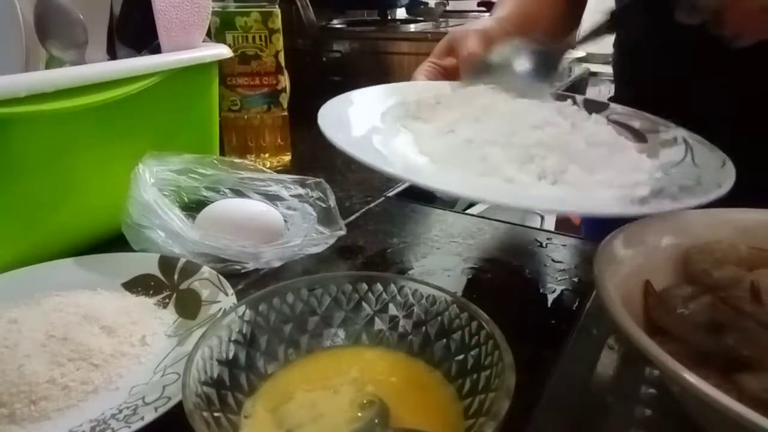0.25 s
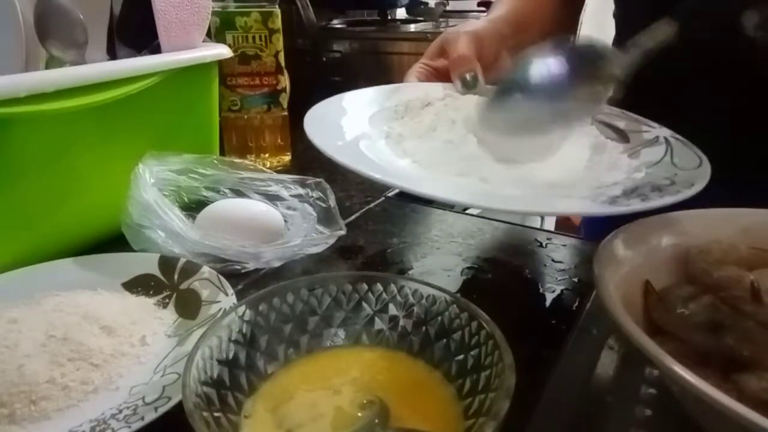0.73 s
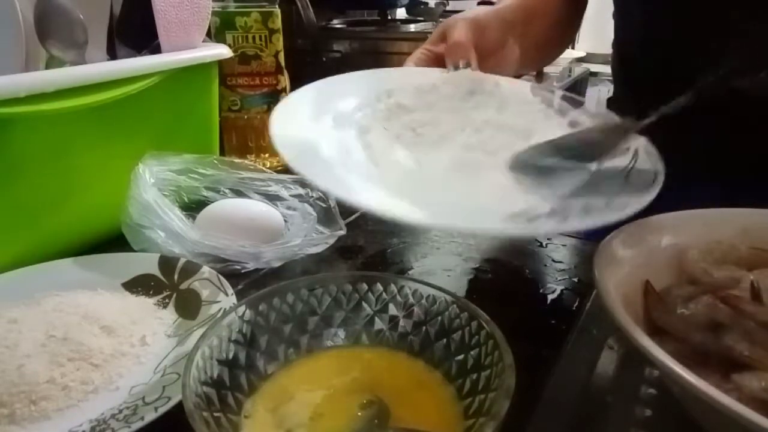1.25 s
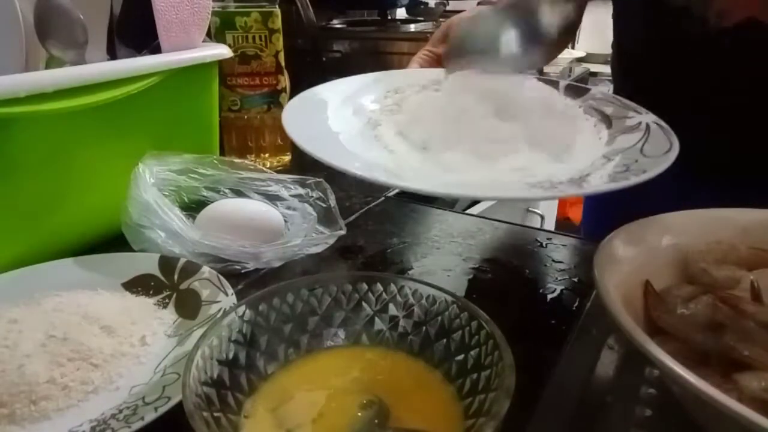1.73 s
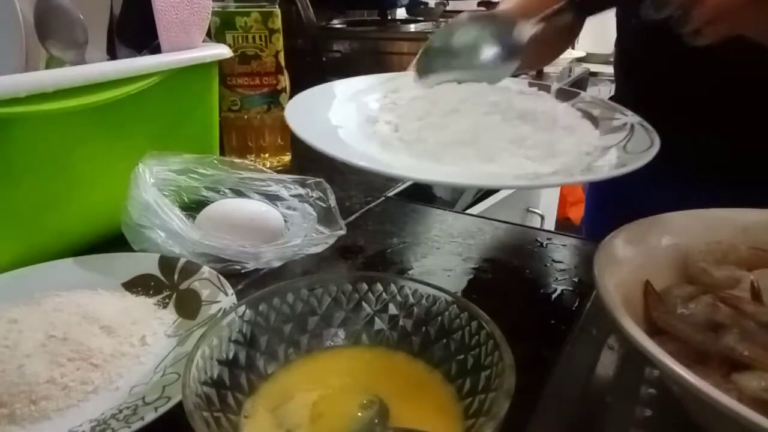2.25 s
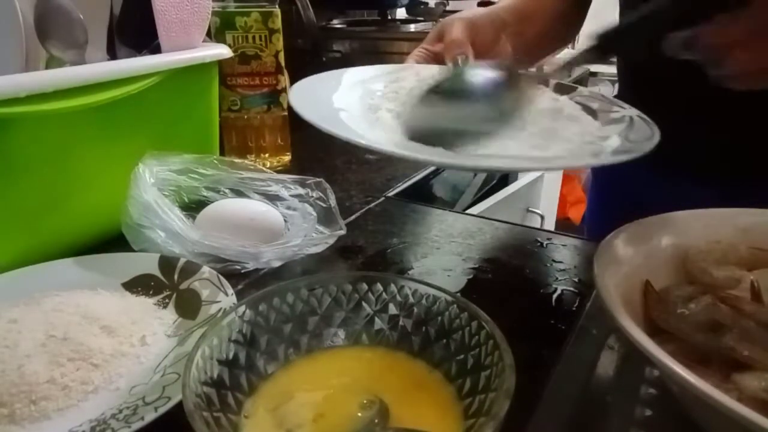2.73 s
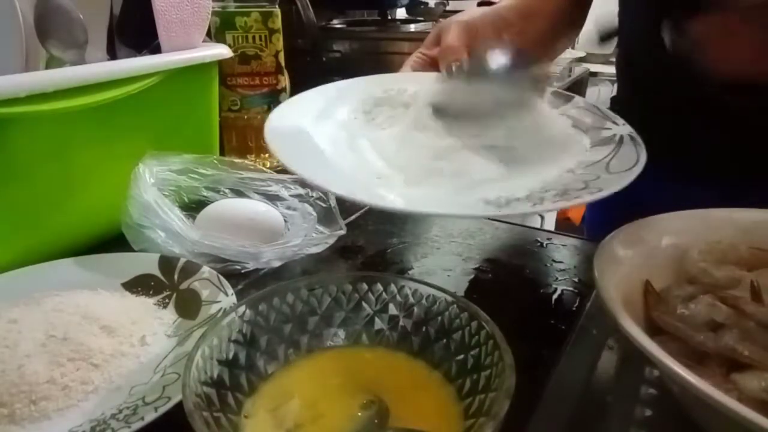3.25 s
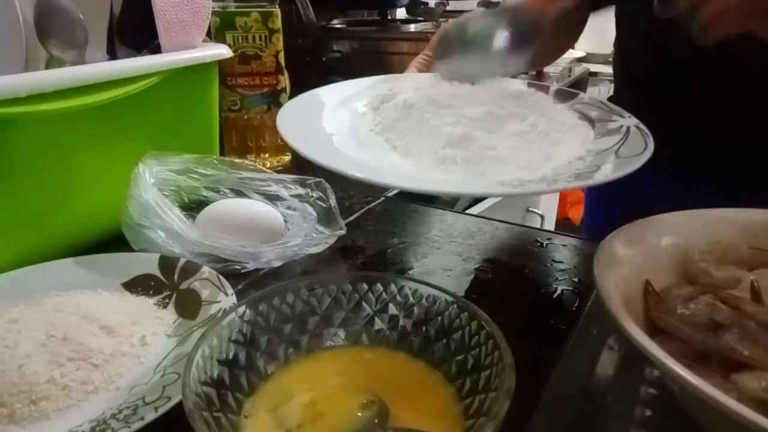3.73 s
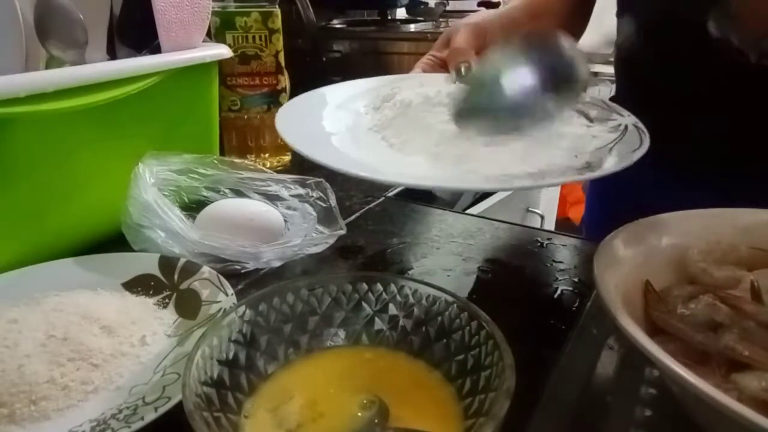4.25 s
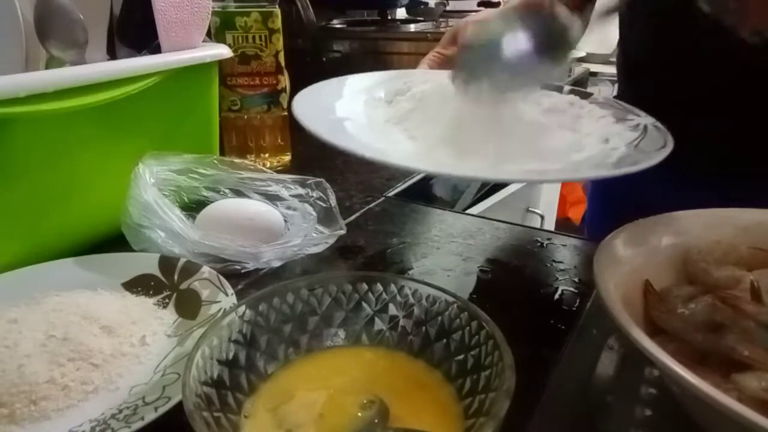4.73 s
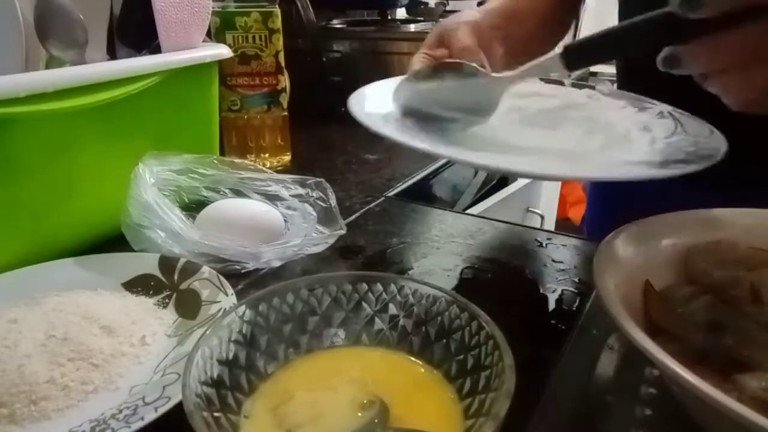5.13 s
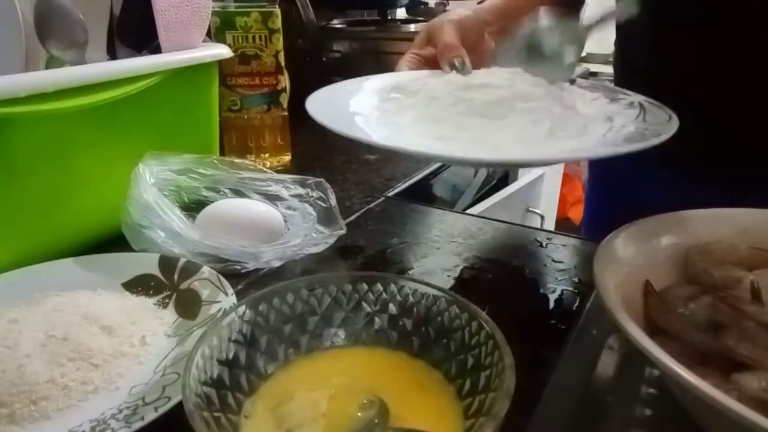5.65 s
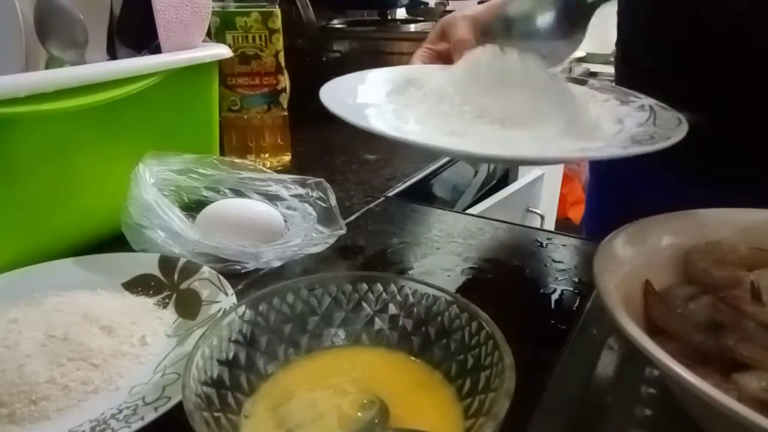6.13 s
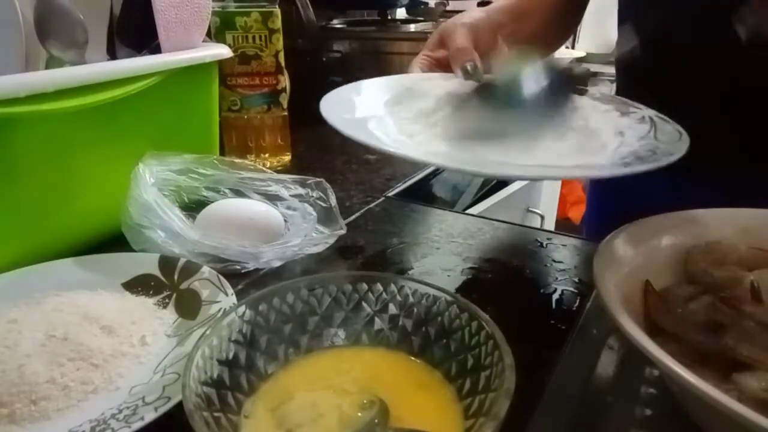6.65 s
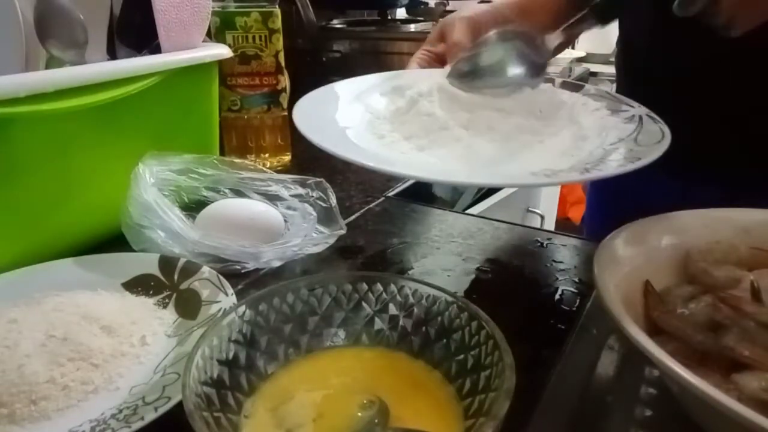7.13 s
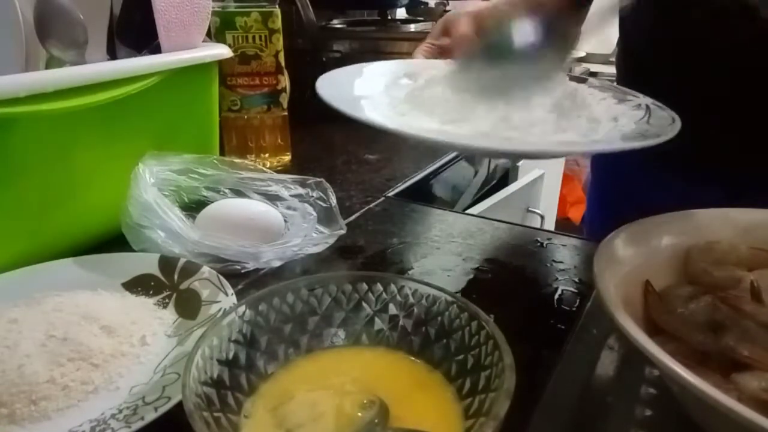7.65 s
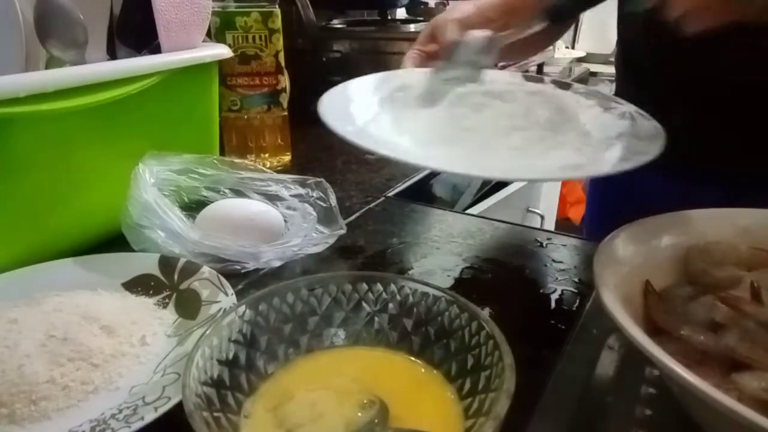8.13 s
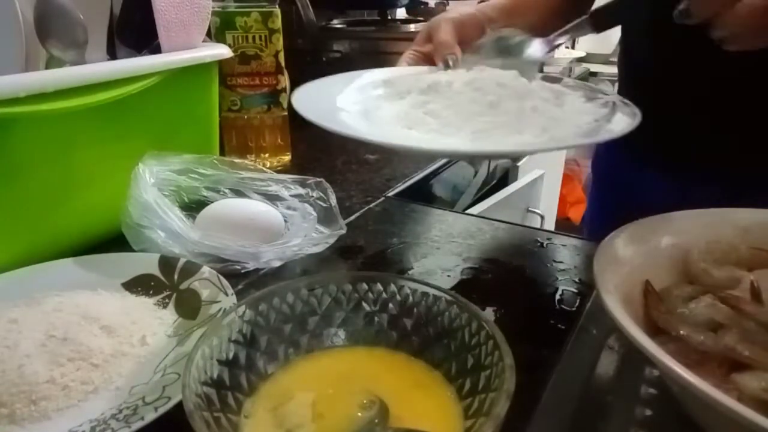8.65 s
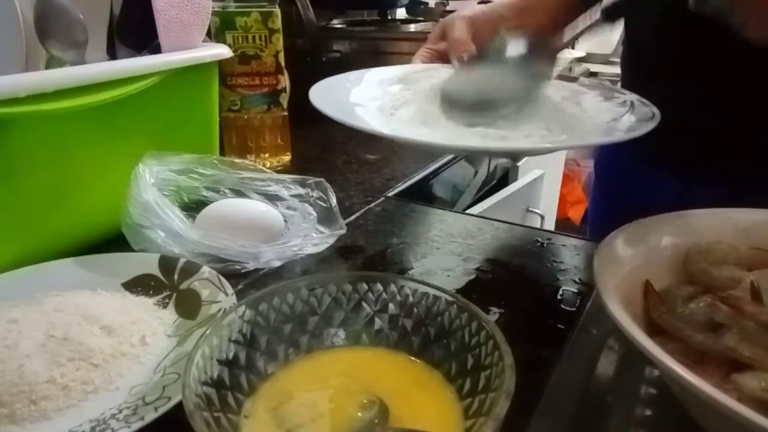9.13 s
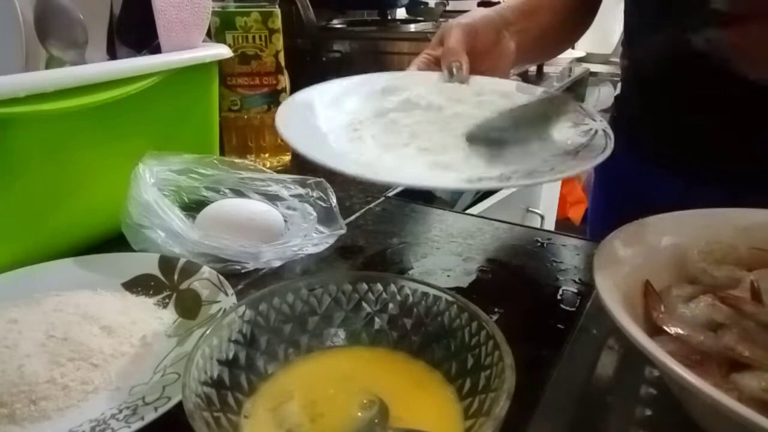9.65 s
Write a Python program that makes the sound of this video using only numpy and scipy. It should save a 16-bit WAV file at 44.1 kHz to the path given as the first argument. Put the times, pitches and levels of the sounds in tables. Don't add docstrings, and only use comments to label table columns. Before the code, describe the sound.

Gritty spoon strokes hiss through flour on a hand-held plate, punctuated by sharp clinks and soft thuds, over faint street rumble and microphone hiss.

```python
import sys
import numpy as np
from scipy import signal
from scipy.fft import rfft, irfft, next_fast_len
from scipy.io import wavfile

SR = 44100
rng = np.random.default_rng(int(sys.argv[2]) if len(sys.argv) > 2 else 0)


def output_pcm(signal):
    pcm = np.clip(np.atleast_2d(signal).T, -1, 1) * 32767
    wavfile.write(sys.argv[1], SR, np.round(pcm).astype(np.int16))


def attenuation_scalar(level_db):
    decades = np.asarray(level_db, float) / 20
    return 10 ** decades


N = 436590


def in_time(rows):
    s, *columns = np.transpose(rows)
    return [np.interp(np.arange(N) / SR, s, column) for column in columns]


def rms_one(x):
    return x / np.sqrt(np.mean(x ** 2) + 1e-20)


def drift(rate_hz):
    knots = rng.standard_normal(1001)
    return np.interp(np.arange(N) / SR * rate_hz, np.arange(len(knots)), knots)


def swell(middle, length):
    half = max(length, .05) / 2
    first, end = max(round((middle - half) * SR), 0), min(round((middle + half) * SR), N)
    out, span = np.zeros(N), np.arange(first, end)
    out[span] = np.cos(np.pi / 2 * (span / SR - middle) / half) ** 2
    return out


def swells(rows):
    return sum(attenuation_scalar(db) * swell(middle, length) for middle, length, db in rows)


def resonate(x, peaks):
    out = 0
    for k, (hz, width, db) in enumerate(peaks):
        r = np.exp(-np.pi * width / SR)
        b = (1 - r * r) / 2 * np.array([1, 0, -1])
        a = [1, -2 * r * np.cos(2 * np.pi * hz / SR), r * r]
        twice = signal.lfilter(b, a, signal.lfilter(b, a, x))
        out = out + (-1) ** k * attenuation_scalar(db) * twice
    return rms_one(out)


def patchy(x, peaks, patch_db):
    out = 0
    for k, (hz, width, db) in enumerate(peaks):
        gain = attenuation_scalar(db + patch_db * drift(14)) * width ** .5
        out = out + (-1) ** k * gain * resonate(x, [(hz, width, 0)])
    return rms_one(out)


def grit(spread_db, flutter_db):
    sizes = attenuation_scalar(spread_db * np.minimum(rng.exponential(1, N), 4))
    return rng.standard_normal(N) * sizes * attenuation_scalar(flutter_db * drift(45))


def away(hz, favoured_hz):
    return np.abs(np.log2(hz / favoured_hz))


def tint(x, hz, db):
    size = 2 ** 14
    bins = np.arange(size // 2 + 1) * SR / size + 1
    cepstrum = irfft(np.log(10) / 20 * np.interp(np.log(bins), np.log(hz), db))
    cepstrum[1:size // 2] *= 2
    return irfft(rfft(x, size) * np.exp(rfft(cepstrum[:size // 2], size)), size)[:len(x)]


def struck(modes, t, free, colour_db, split_hz):
    hz, db, t60 = (column[:, None] for column in np.transpose(modes))
    decay = attenuation_scalar(db + colour_db[:, None] - 60 * t / (t60 * np.clip(free, .09, 1.1)))
    partner = np.sin(2 * np.pi * (hz + split_hz[:, None]) * t + 2)
    pair = np.sin(2 * np.pi * hz * t) - .6 * partner
    rings = (decay * pair).sum(0) * (1 - np.exp(-t * hz.min() / .6))
    return rings / np.abs(rings).max()


# time in seconds, level in dB.
LOW_BACKGROUND = [(0, -55), (.8, -57.5), (1.25, -54.5), (1.7, -59.5), (3.0, -60.5), (4.1, -64), (4.4, -64),
                  (5.5, -65.5), (7.0, -67), (8.0, -64.5), (9.0, -65), (9.6, -60), (9.9, -78)]
# frequency in Hz, width in Hz, level in dB.
RUB = [(638, 236, -3.5), (781, 117, 3), (1000, 303, 3), (1350, 390, -6), (1884, 630, -3.5)]


def rub(sweep_gain):
    gain = np.hypot(attenuation_scalar(in_time(LOW_BACKGROUND)[0]), attenuation_scalar(-11) * sweep_gain)
    return gain * resonate(grit(spread_db=2.0, flutter_db=3.0), RUB)


# frequency in Hz, width in Hz, level in dB.
RASP = [(2480, 1500, -1.5), (3300, 1640, 2.5), (4210, 1560, 5.5), (5000, 2640, 1)]


def rasp(sweep_gain):
    grains = grit(spread_db=2.5, flutter_db=2.5)
    return attenuation_scalar(-5) * (attenuation_scalar(-60.5) + sweep_gain) * patchy(grains, RASP, patch_db=2.0)


# frequency in Hz, width in Hz, level in dB.
POWDER = [(6600, 3200, -1.5), (8000, 960, 6.5), (8600, 6500, -9.5), (13000, 9300, -25)]


def powder(gain):
    return gain * resonate(grit(spread_db=5.0, flutter_db=2.4), POWDER)


# middle in seconds, length in seconds, rasp level in dB,
# fine powder relative to rasp in dB.
SWEEPS = [(0.072, 0.14, -60, -5), (.45, 0.81, -73, 8), (0.913, .3, -58.5, -1), (1.422, 0.79, -66, 2),
          (1.994, 0.51, -70, -1), (2.544, .4, -62.5, -3.5), (2.994, 1, -65, 1), (3.29, 0.65, -53.5, -8),
          (3.88, 0.52, -51.5, 1), (4.16, 0.36, -58, -14), (4.508, 0.55, -58, -2),
          (5.016, 0.61, -50.5, -1.5), (5.256, 0.51, -56, 2), (5.796, 0.35, -50, -3.5),
          (6.098, 0.69, -61.5, 4), (6.38, 0.6, -53, -1.5), (6.84, 0.53, -51, -6), (7.095, 0.33, -71, 15),
          (7.549, 0.86, -55, 1.5), (8, 0.37, -54, 3), (8.352, 0.63, -60, 4.5), (8.676, 0.76, -56, 4.5),
          (9.212, .3, -70, 11), (9.604, 0.54, -52, 1.5), (9.9, 0.42, -52.5, -4)]
# middle in seconds, length in seconds.
LIFTS = [
    (6.794, 0.11),
    (7.18, 0.16),
    (8.22, 0.24),
    (8.96, 0.13),
    (9.08, .08),
    (9.442, 0.099),
]


def strokes():
    sweep_gain, powder_gain = 0, attenuation_scalar(-58.5)
    for middle, length, db, fine_db in SWEEPS:
        sweep = attenuation_scalar(db) * swell(middle, length)
        sweep_gain = sweep_gain + sweep
        powder_gain = np.hypot(powder_gain, attenuation_scalar(fine_db) * sweep)
    lift = attenuation_scalar(-4.5 * sum(swell(middle, length) for middle, length in LIFTS))
    return rub(sweep_gain) + lift * rasp(sweep_gain) + lift ** .3 * powder(powder_gain)


# time in seconds, level in dB, nearness as upper relative to deep rumble in dB.
TRAFFIC = [(0.0, -46, 9.5), (0.16, -43, -0.5), (0.8, -42, 1), (1.13, -41.5, -3), (1.32, -46.5, 2.5),
           (2.45, -39, -10.5), (2.78, -48, 3), (2.81, -42, -2.5), (3.88, -45.5, -1.5), (4.05, -49.5, 3.5),
           (5.27, -45.5, -2), (6.17, -51, 2), (6.28, -46, -4), (6.51, -52, 1.5), (8.02, -50, -0.5),
           (8.33, -41, -10.5), (8.46, -52.5, 0), (9.9, -49, -3)]
# frequency in Hz, width in Hz, level in dB.
DEEP = [(66.8, 29.6, -4), (84, 23.6, 2), (102.5, 34.3, 0.5)]
# frequency in Hz, width in Hz, level in dB.
UPPER = [(140.6, 34.4, 5.5), (194.5, 68, -6), (252.6, 59, -9), (333, 77, -13)]


def traffic():
    level_db, near_db = in_time(TRAFFIC)
    deep = attenuation_scalar(level_db - 0.5) * resonate(rng.standard_normal(N), DEEP)
    upper = attenuation_scalar(level_db + near_db - 1) * resonate(rng.standard_normal(N), UPPER)
    return deep + upper


# middle in seconds, length in seconds, level in dB.
HUMS = [(0.255, 0.48, -65.5), (1.25, 0.27, -69), (2.122, 0.22, -67), (2.6, 0.65, -75), (4.48, 0.89, -63),
        (4.9, 0.72, -66), (5.547, .6, -69), (6.1, 0.73, -68), (6.49, 0.25, -61), (6.85, 0.58, -65.5),
        (8.122, 0.43, -63.5), (8.9, 0.97, -69.5), (9.598, 0.71, -72)]


def hum():
    gain = attenuation_scalar(-70) + swells(HUMS)
    return attenuation_scalar(2.5) * gain * resonate(rng.standard_normal(N), [(436.4, 59, 0)])


# middle in seconds, length in seconds, pitch in Hz, glide in Hz per second,
# level in dB.
DRONES = [(.89, 0.2, 89.6, -25, -41), (1.171, 0.49, 81.8, -0.5, -39.5), (1.539, 0.31, 86.3, 7, -40),
          (1.95, 0.82, 90.05, 1, -43), (2.502, 0.23, 93.7, -10, -44), (3.6, 0.61, 80.46, 14, -44.5),
          (4.801, 0.42, 84.8, -6, -48), (5.17, 0.41, 93, -17, -43.5), (6.301, 0.23, 81.7, 13, -44),
          (8.288, 0.28, 81.8, -7, -40.5), (9.159, 0.149, 88.3, -14, -43), (0.192, 0.54, 147.5, 35, -45),
          (.56, 0.49, 190.3, 109.5, -48), (4.55, 0.58, 151.7, -8, -46.5), (5.05, 0.76, 147.5, -14.5, -47)]


def drones():
    out = np.zeros(N)
    wobble_hz, throb = 1.88 * drift(12), attenuation_scalar(4.5 + 0.94 * drift(4.62))
    for middle, length, hz, glide, db in DRONES:
        rise = swell(middle, length)
        on = np.flatnonzero(rise)
        pitch = hz + glide * (on / SR - middle) + wobble_hz[on]
        tone = np.sin(2 * np.pi * np.cumsum(pitch) / SR)
        out[on] += attenuation_scalar(db) * rise[on] ** .5 * throb[on] * tone
    return out


# frequency in Hz, density in dB per Hz.
HISS = [(15, -46), (25, -17.5), (70, -5.5), (99, -4), (183, -13.5), (290, -21), (446, -22.5), (633, -28),
        (1030, -38), (1580, -32.5), (3640, -39), (5460, -33.5), (7960, -21), (11000, -32.5), (15600, -32.5)]


def hiss():
    hz, db = np.transpose(HISS)
    bins = np.arange(N // 2 + 1) * SR / N + 1
    shape = attenuation_scalar(np.interp(np.log(bins), np.log(hz), db))
    noise = irfft(rfft(rng.standard_normal(N)) * shape, N)
    return attenuation_scalar(-51 + 1.4 * drift(9)) * rms_one(noise)


# middle in seconds, length in seconds, level in dB.
HANDLING = [
    (.9, 1.4, -50.5),
    (9.1, .4, -64),
]


def handling():
    return swells(HANDLING) * resonate(rng.standard_normal(N), [(36, 22, 0)])


COLOUR_HZ = [450, 650, 850, 1250, 1900, 2700, 4000, 6200, 9000, 12000]
# time in seconds, then gain in dB at each inner pitch of COLOUR_HZ.
BLOW_COLOURS = [(0.644, -0.5, 0.5, 2.5, -1, 3, 0.5, -1.0, 2), (0.833, -4.5, 0, 1.5, -1.5, 1.5, -0.5, 2.0, -2),
                (1.166, 0, 5.5, -11, -1, 5.0, -1.0, 0.5, 2), (1.228, -4, 3, 5.5, -1, 3.0, -1, 1, -1.0),
                (1.305, 0.0, 0.0, 0.0, 1.5, 5.0, 1, -10, 0), (2.074, -2, 2, -2, 1, -5, 1.5, -3.5, -1.5),
                (2.702, 2.0, 0, -1, 1, -5.5, -3.5, 3, -0.5), (4.3345, 11, -3, 2, 0.5, -2.5, -3.0, 0, 3),
                (4.63, -1, 2.5, 1.5, -2, 0, -1, -3, 0), (4.841, 5, 0, -4, 1, 0, 2, -8, -6.5),
                (6.053, -2, 4.0, 2, -10, -5, -1, 2, -0.5), (6.47, -3, -4.0, 3.5, -3, -11.0, 1.5, -1.0, 4),
                (6.707, 2.5, 0.5, -1, 3, -2, 3.5, -1, -7.5), (7.314, 4, 0, -5, -7, 7, 6, 3.0, 2.0),
                (7.72, 3.5, -2, 1, -2.5, 1, 2, -1.0, 4), (7.933, 6, -7, 3, 1.5, 1.5, -3.5, 2, 0.5),
                (8.396, -2, 6, -2, -4, 4, -3.0, 4, 0.0), (8.634, -1, 2.5, -0.5, -4, -1, -1.5, 1, 3.5),
                (8.894, 6, 1, -1.0, 0.0, -0.0, 0.0, 0.0, 0.5), (9.114, 2, 0.5, 1.5, 0.5, 3, -0.5, 2.5, -3),
                (9.298, 2, 4, -1.5, 6, 0, 1.5, -4.0, 1), (9.575, 0, 1, -9, -6, 2.0, 1, 7, 6)]


def coloured(x):
    out, fade = x.copy(), np.clip(np.linspace(6, 0, round(.18 * SR)), 0, 1)
    for s, *db in BLOW_COLOURS:
        start = round(s * SR) - 90
        span = slice(start, start + len(fade))
        out[span] = (1 - fade) * x[span] + fade * tint(x[span], COLOUR_HZ, [0, *db, 0])
    return out


# frequency in Hz, level in dB, t60 in seconds.
PLATE = [(560, -12, .03), (680, -4, .04), (797, -1.5, .04), (1012, 0, .045), (1255, -2, .035),
         (1420, -2, .035), (1580, -5, .03), (1865, -1, .09), (2040, -6, .04), (2550, 0, .05),
         (2960, -5, .05), (3310, -5, .04), (3950, 0, .06)]
# time in seconds, peak in dB, favoured low frequency in Hz,
# upper modes relative to lower in dB, favoured upper frequency in Hz.
THUDS = [(0.646, -25, 840, -8.5, 3700), (0.8368, -34.5, 820, -24, 2550), (1.1695, -35.5, 790, -17, 3930),
         (1.255, -30.5, 850, -9, 3000), (1.862, -43, 785, -14, 2500), (2.075, -35.5, 850, -15, 2500),
         (2.704, -28, 1470, -24, 2880), (4.6327, -20, 980, -12, 2440), (7.7292, -32, 1100, -10, 2550),
         (4.844, -26, 790, -13.5, 2550), (6.057, -30.5, 850, -8, 3950), (6.4718, -30.5, 1350, -10, 3500),
         (6.7098, -19, 1370, -4.5, 2280), (7.316, -37, 785, -13, 2540), (7.481, -39, 900, -14, 2520),
         (7.7241, -29, 800, -10, 2550), (7.9364, -36.5, 1010, -7, 1870), (8.3978, -28.5, 945, -15, 2500),
         (8.6365, -25.5, 970, -10, 2470), (8.897, -41.5, 810, -17, 2500), (9.1178, -17, 945, 1.5, 2950),
         (9.303, -35, 1320, -16, 3300), (9.577, -32.5, 855, -13, 2950)]


def thuds():
    out, t, hz = np.zeros(N + SR), np.arange(SR // 8) / SR, np.array(PLATE)[:, 0]
    freedom = 0.55
    for s, peak_db, low_hz, upper_db, upper_hz in THUDS:
        colour_db = np.where(hz > 1700, upper_db - 17 * away(hz, upper_hz), -9 * away(hz, low_hz))
        colour_db = colour_db + 1.3 * rng.standard_normal(len(hz))
        split_hz = 60 * rng.standard_normal(len(hz))
        thud = attenuation_scalar(peak_db) * struck(PLATE, t, freedom, colour_db, split_hz)
        out[round(s * SR):][:len(t)] += thud
        chance = rng.standard_normal()
        bounce_s = .0041 * (1 + .07 * chance)
        out[round((s + bounce_s) * SR):][:len(t)] += attenuation_scalar(-9 + 1.6 * chance) * thud
    return out[:N]


def kitchen(x):
    t, t60_s = np.arange(SR // 2) / SR, .25
    tail = rng.standard_normal(len(t)) * attenuation_scalar(-60 * t / t60_s) * (t > .004)
    tail = signal.lfilter([1], [1, -.3], tail)
    return attenuation_scalar(-12) * signal.fftconvolve(x, tail / np.sqrt(np.sum(tail ** 2)))[:N]


# frequency in Hz, width in Hz, level in dB.
CRACK = [(3060, 1150, -1), (4250, 1230, 2.5), (6430, 1700, 1.5), (8150, 1700, 2), (10630, 750, -13)]
# frequency in Hz, width in Hz, level in dB.
GLAZE = [(12200, 3400, -3), (15000, 2100, 4)]


def crack(contacts, t, favoured_hz, free):
    burst = np.convolve(attenuation_scalar(-60 * t / 0.019), np.abs(contacts))[:len(t)]
    burst = burst * rng.standard_normal(len(t))
    burst = rms_one(0.5 * resonate(burst, CRACK) + 0.12 * free * resonate(burst, GLAZE))
    burst = burst + 0.41 * resonate(burst, [(favoured_hz, 1400, 0)])
    return burst / np.abs(burst).max()


RIM_HZ = [1865, 2935, 2980, 3810, 3950, 4170, 4255, 4510, 5030, 5082, 5507, 5548, 5830, 5924, 6605, 6675,
          6975, 7630, 7850, 8115, 8200, 8280, 8530, 8680, 8960, 9040, 9290, 10285, 12480, 14965, 2320, 2616,
          4554, 12200, 14400, 15250]
# level in dB, t60 in seconds.
RIM = [(-15.5, 0.3), (-8.5, 0.28), (-15, .25), (-9.5, 0.17), (-7, 0.24), (-3.5, 0.38), (-8, 0.28),
       (-13, .2), (-8, .27), (-6.5, 0.29), (-5.5, .36), (-6, 0.3), (-6, 0.28), (-6, 0.37), (-5, 0.21),
       (-6, 0.23), (-6, 0.21), (-16, .25), (-10, .3), (-13, .22), (-4, 0.45), (-1, 0.37), (-5, 0.33),
       (-4.5, 0.4), (-13, 0.47), (-5, 0.28), (-8, 0.22), (0.5, 0.16), (-12, .22), (-11, .24), (-17, 0.26),
       (-13, 0.28), (-12.5, 0.26), (-15, .18), (-16, .18), (-19, .15)]
PLACE_S = [
    1.23,
    2.7,
    4.33,
]
# gain in dB at the first, second and third place.
PLACES = [(-11.0, -3.5, 5.5), (-2, -4.0, 4), (8, 10.5, 0), (8, -6.0, 2), (-8.0, -20.0, 3), (-1, 3.5, -7),
          (-8.0, -21.0, 1), (1.0, 5.0, -3.0), (-3, -2, 1), (-1, -11, 6), (-2, 7.5, -2), (-8, -4, -1),
          (-9.0, -9, 5.0), (-10, -8.0, -7), (-9, -7, -2), (-16.0, -14, 1.0), (-1, -10, -4), (-5.0, -6, 0),
          (-10.0, -11.0, -7), (6, -2, 3), (-10.0, -4.0, -7.0), (-10.0, -5, -6), (-2.0, -10, -14),
          (-13.0, -10.0, -10), (-8.0, 1, -1), (-12, 4, 1), (-8.0, 11, -3), (-16.0, -2, -10),
          (-12.0, 2.0, -2), (-16.0, -2.0, -9.0), (-11.0, -2, -6), (-13.0, -2, -0.5), (-9.0, 2, -13),
          (-3.0, -2, -6.0), (-4.0, -13.0, -1.0), (-3.0, -1.0, -19)]
# time in seconds, peak in dB, chatter length in ms,
# favoured frequency in Hz, crack relative to ring in dB.
TICKS = [(0.647, -30, 3.9, 5900, 8), (.907, -43, 8.2, 4160, -12), (1.168, -35.5, 3.4, 5920, -12),
         (1.278, -48, 11, 3900, -1.5), (1.309, -40, 12, 4370, -8), (1.342, -36, 1.4, 4350, 4),
         (3.079, -41, 2.8, 3900, 0.5), (4.845, -41, 4.5, 3900, -5), (4.866, -39.5, 9.5, 3600, 5),
         (6.055, -24.5, 0.77, 6600, -4), (6.472, -28.5, 1.1, 6450, 9), (6.7097, -13, 1.4, 6620, 6),
         (7.724, -37, 3.7, 2940, 4), (8.398, -35, 3.0, 4170, -10), (8.636, -28.5, 3.7, 5000, -11),
         (8.898, -41, 3.5, 5050, -9), (9.117, -24.5, 3.6, 5870, 1), (1.2497, -22.5, 0.43, 7060, 9),
         (1.865, -39, 3.8, 5030, -6), (4.6324, -32, .6, 3810, 3), (1.327, -40, 9, 4510, -8),
         (6.7143, -17.5, 1.9, 5440, 12), (9.1245, -31, 2.5, 3950, -8), (4.337, -20, 6.6, 2616, -4)]
# time in seconds, peak in dB, chatter length in ms,
# favoured frequency in Hz, crack relative to ring in dB.
CLINKS = [(0.8347, -28, 3.5, 6600, 13), (1.231, -30, 4, 6975, -3), (1.244, -24.5, 4.3, 3800, -0.5),
          (2.7038, -5, 0.32, 4280, 11), (4.3369, -16, 9.4, 4070, -4), (4.349, -27, 8.2, 2900, -5),
          (4.366, -36, 7.7, 4600, -6), (4.384, -25, 9.3, 5540, -4), (7.541, -36, 1.8, 6040, -2.5),
          (7.9357, -26, 3.9, 7440, 10), (9.3, -31.5, 4.5, 3500, 5), (9.578, -37, 3.8, 3000, -2)]


def clinks():
    out, t, hz = np.zeros(N + SR), np.arange(SR // 4) / SR, np.array(RIM_HZ)
    modes, early = np.column_stack([hz, RIM]), t[:1500]
    rows = [(*row, min(0.39 + 2.5 * max(row[1] + 25, 0), 0.76)) for row in CLINKS]
    rows += [(*row, 0.11) for row in TICKS]
    for s, peak_db, chatter_ms, favoured_hz, crack_db, free in rows:
        slip = early / np.clip(chatter_ms, .3, 12) * 1000
        rough = rng.standard_normal(len(early))
        contacts = rough ** 3 * np.sqrt(slip) * np.exp(-2 * slip)
        contacts /= np.sqrt(np.sum(contacts ** 2))

        reach = np.abs(np.exp(-2j * np.pi * hz[:, None] * early) @ contacts)
        octaves = away(hz, favoured_hz)
        narrow_db = 16 * np.clip(.75 - free, 0, 1) * octaves
        narrow_db -= 5.5 * np.exp(-(octaves / .04) ** 2)
        colour_db = 1.5 * rng.standard_normal(len(hz)) - narrow_db - 20 * np.log10(reach + .15)

        heard = t[:1500 + round(free * .4 * SR)]
        ring = struck(modes, heard, free, colour_db, 35 * rng.standard_normal(len(hz)))
        clink = signal.fftconvolve(ring, contacts)[:len(heard)]
        if chatter_ms > 7:
            clink *= attenuation_scalar(4 * np.interp(heard * 250, np.arange(len(rough)), rough))
        clink /= np.abs(clink).max()

        burst = attenuation_scalar(crack_db) * crack(contacts, early, favoured_hz, free)
        burst = np.pad(burst, (0, len(heard) - len(burst)))
        scale = attenuation_scalar(peak_db) / np.abs(clink + burst).max()
        for place_s, place_db in zip(PLACE_S, np.transpose(PLACES)):
            if 0 < s - place_s < .06:
                clink = tint(clink, np.sort(hz), place_db[np.argsort(hz)])
        out[round(s * SR):][:len(heard)] += scale * (clink + burst)
    return out[:N]


# start in seconds, length in seconds, level in dB,
# frequency in Hz, width in Hz.
SLIDES = [
    (.903, .024, -54, 4150, 500),
    (1.278, 0.015, -52, 4000, 700),
    (1.31, 0.029, -50, 4450, 400),
    (4.345, .13, -49.5, 3000, 2200),
    (5.07, .03, -47, 8150, 4500),
    (6.84, .022, -51, 4250, 700),
    (6.868, .035, -54, 4250, 600),
    (6.974, 0.026, -54, 3530, 1000),
    (7.718, 0.023, -49, 1500, 2000),
]


def slides():
    out, grains = np.zeros(N), grit(spread_db=2.5, flutter_db=4.0)
    for s, length, db, hz, width in SLIDES:
        span = slice(round(s * SR), round((s + length) * SR))
        skid = resonate(grains[span], [(hz, width, 0)])
        out[span] += attenuation_scalar(db) * skid * np.hanning(span.stop - span.start) ** .5
    return out


# start in seconds, peak in dB, centre in Hz,
# fade in seconds.
SCUFFS = [(1.56, -39, 850, 0.19), (4.338, -36, 920, 0.21), (5.796, -39.5, 890, 0.25), (5.8, -37, 300, 0.28),
          (5.06, -43, 710, 0.14), (7.6, -49, 1200, 0.14), (6.254, -43, 900, 0.15), (7.4, -53, 710, 0.13),
          (8.638, -42, 950, 0.12), (7.725, -39, 1130, 0.1), (9.578, -44, 750, .1), (9.305, -39, 1100, .09)]
# start in seconds, peak in dB, centre in Hz,
# fade in seconds.
SWISHES = [(2.4657, -48, 4440, 0.2), (3.1966, -40.5, 3400, 0.2), (3.8512, -43, 2940, 0.21),
           (5.0379, -38.5, 2840, 0.25), (5.5712, -44, 4270, 0.42), (5.6925, -45, 4280, 0.21),
           (6.2048, -44, 4470, 0.27), (6.355, -44.5, 4300, 0.33), (6.5131, -41, 4200, 0.22),
           (6.8443, -37, 3970, 0.17), (6.979, -36.5, 3850, 0.13), (7.3994, -45.5, 4320, 0.85),
           (7.5994, -48, 3550, 0.9), (8.6794, -52, 3380, 0.32), (9.253, -32.5, 3240, 0.24),
           (9.4833, -47, 4380, 0.25), (5.197, -40, 4000, 0.11), (9.0, -44.5, 3500, 0.14)]


def swishes():
    out, t, grains = np.zeros(N), np.arange(SR // 2) / SR, grit(spread_db=2.5, flutter_db=4.0)
    for s, peak_db, centre_hz, fade in SWISHES + SCUFFS:
        at = round(s * SR)
        peaks = [(centre_hz, centre_hz * 0.81, 0), (centre_hz * 2.15, centre_hz * 1.0, -4)]
        slide = resonate(grains[at:at + len(t)], peaks)
        shape = np.clip(t / 0.0037, 0, 1) * attenuation_scalar(-60 * (t / fade) ** 2)
        out[at:at + len(t)] += attenuation_scalar(peak_db - 10) * slide * shape[:len(slide)]
    return out


def scene():
    steady = strokes() + traffic() + hum() + drones() + hiss() + handling() + slides() + swishes()
    dull, bright = coloured(thuds()), coloured(clinks())
    mono = dull + bright + kitchen(bright + attenuation_scalar(-4) * dull) + steady
    return np.array([mono, mono])


def band_limit(x):
    return signal.sosfilt(signal.butter(12, 15800, fs=SR, output="sos"), x)


def record(dry):
    band = signal.butter(3, [420, 4900], "band", fs=SR, output="sos")
    middle = signal.sosfilt(band, dry[0])
    middle = 0.0076 * np.tanh(middle / 0.0014)
    side = attenuation_scalar(-21.5) * signal.hilbert(middle, next_fast_len(N)).imag[:N] * drift(70)
    return band_limit(dry + side * [[1], [-1]])


dry = scene()
out = record(dry)
output_pcm(out)
```